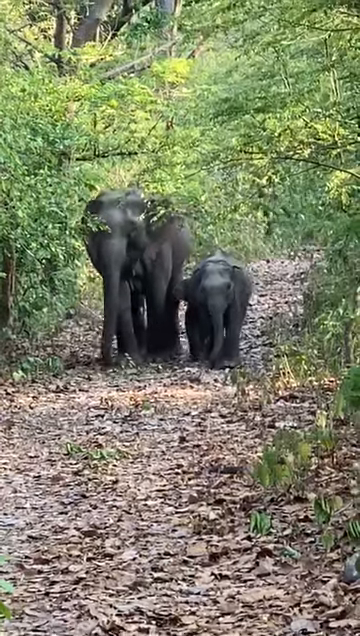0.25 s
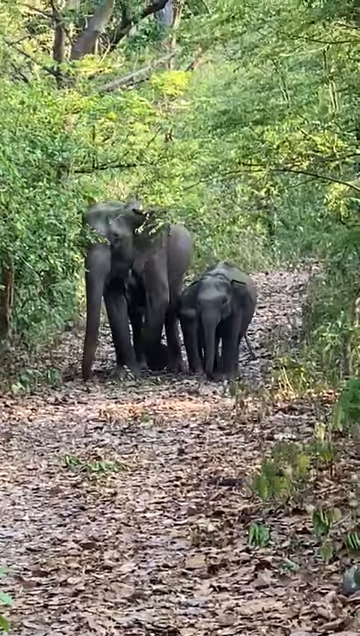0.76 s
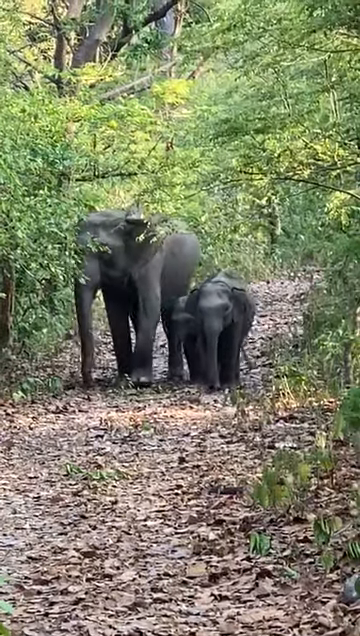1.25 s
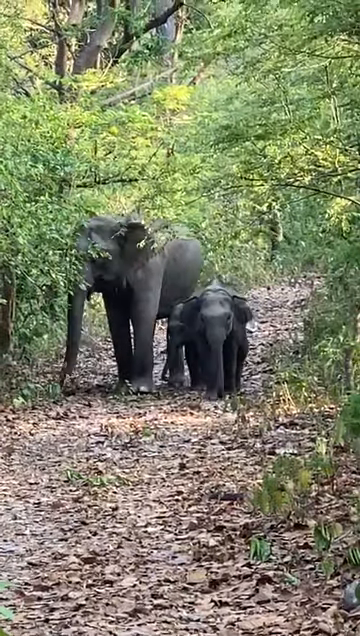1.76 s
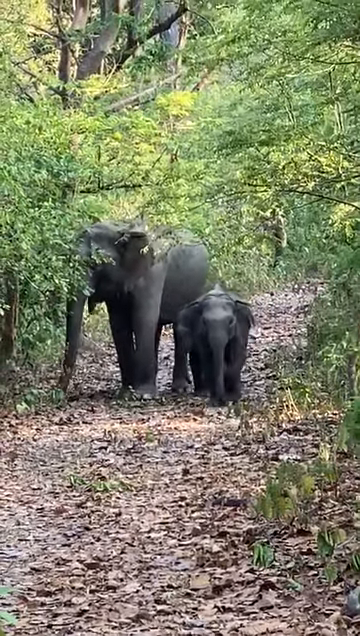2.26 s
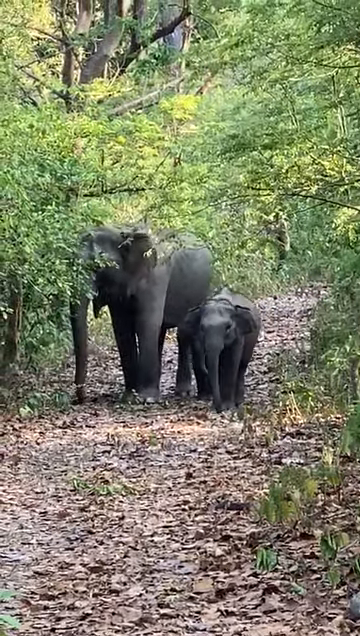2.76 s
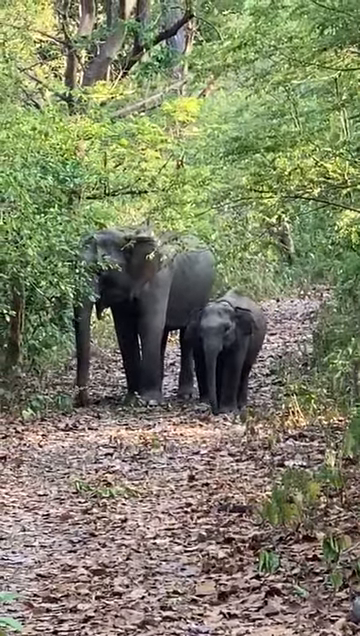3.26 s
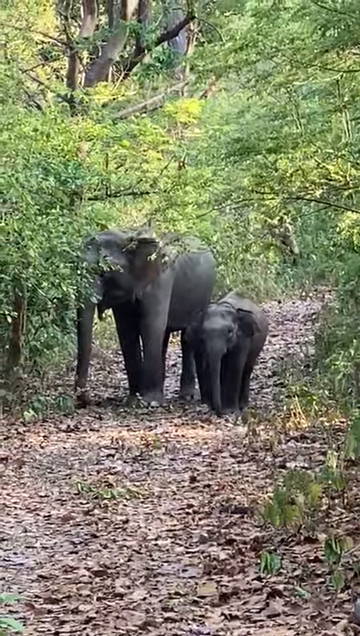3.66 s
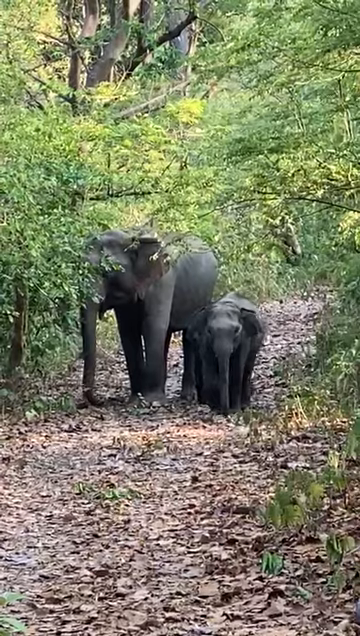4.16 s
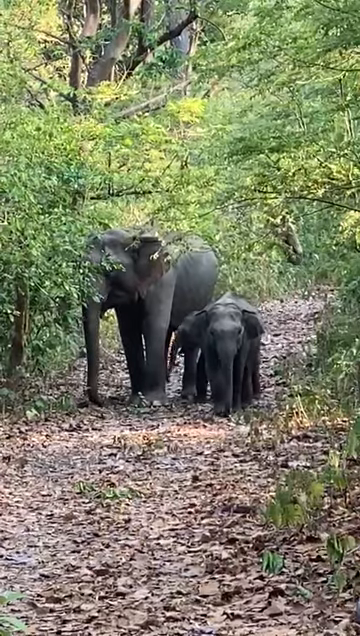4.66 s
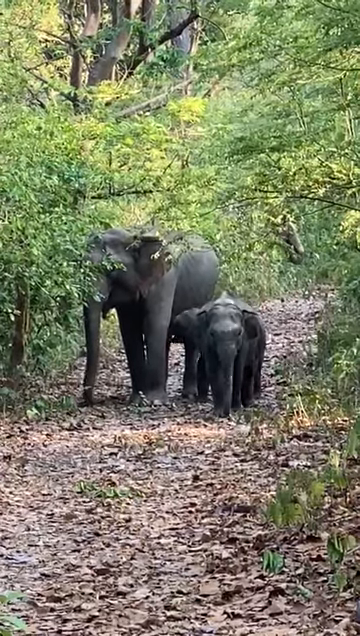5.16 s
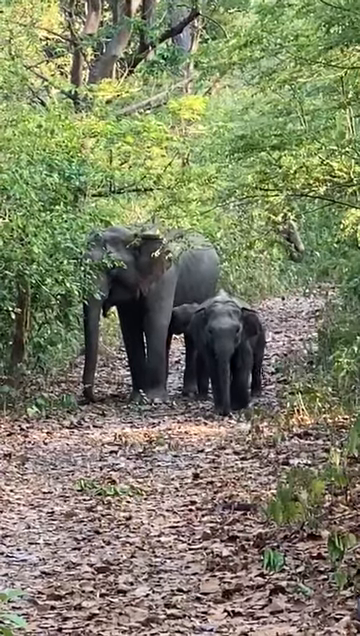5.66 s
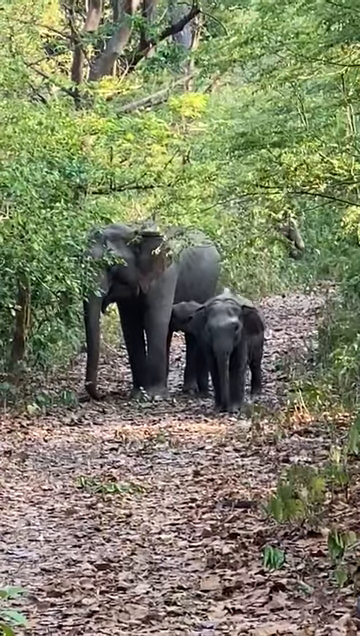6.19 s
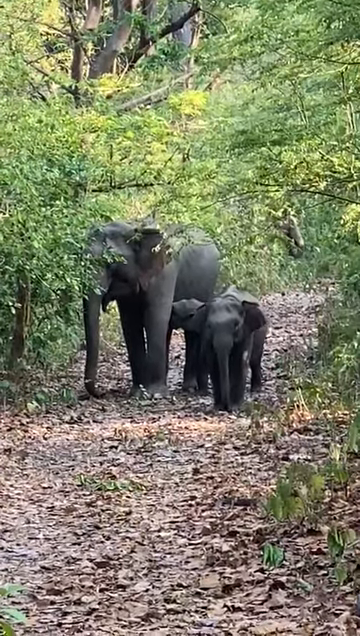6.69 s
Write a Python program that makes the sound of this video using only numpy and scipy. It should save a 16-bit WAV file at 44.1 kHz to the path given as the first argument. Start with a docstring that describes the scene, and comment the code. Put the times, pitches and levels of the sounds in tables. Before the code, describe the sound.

Two quick clear chirps open over a shimmering cricket chorus. A cuckoo's wavering scale emerges softly and rises; around three seconds a bird chatters brightly, and near five seconds comes a burst of clear whistles. After that the calls thin out and crickets dominate. Low damped thumps with leaf crunch, swelling rustle and a barely audible far barbet sit beneath. Open woodland, gentle echo, stereo microphone at a distance from the animals.

```python
"""Songbirds near and far whistle, slide and trill on a forest track by day: near-sines on drawn pitch and level curves.
A cuckoo climbs a wavering scale, a barbet hoots far off, and crickets chirp in stroke pairs over a far chorus.
Damped thumps knock on the path; noise bands make the hum, the leaf rustle and a thin flickering treble.
A decaying noise tail stands for the scatter off trunks and leaves; two spaced ports differ in phase by pitch."""
import sys
import numpy as np
from scipy import signal
from scipy.fft import rfft, irfft, next_fast_len
from scipy.io import wavfile

SR = 44100
rng = np.random.default_rng(int(sys.argv[2]) if len(sys.argv) > 2 else 0)


def int16_out(signal):
    """Quantize to a 16-bit WAV file."""
    q = np.round(np.clip(np.atleast_2d(signal).T, -1, 1) * 32767)
    wavfile.write(sys.argv[1], SR, q.astype(np.int16))


N = 305613
TIME = np.arange(N) / SR
SHARE = np.linspace(0, 1, 17)   # points along a note, as shares of its length


def from_db(db):
    """Decibels to amplitude."""
    return 10 ** (np.asarray(db) / 20)


def rms_one(x):
    """Scale to RMS 1."""
    return x / np.sqrt(np.mean(x ** 2) + 1e-20)


def at_time(rows):
    """Read a (s, value) curve at every sample."""
    return np.interp(TIME, *np.transpose(rows))


def at_hz(points, hz):
    """Read a (Hz, value) curve on a log frequency axis."""
    curve_hz, values = np.array(points).T
    return np.interp(np.log(hz), np.log(curve_hz), values)


def drift(rate_hz):
    """Slow random curve of RMS 1: noise through a two-pole lowpass, run at SR / 40."""
    step = 40
    pole = np.exp(-2 * np.pi * rate_hz * step / SR)
    white = rng.standard_normal(N // step + 2002)
    slow = signal.lfilter([1], [1, -2 * pole, pole * pole], white)[2000:]   # drop the settling
    return np.interp(np.arange(N) / step, np.arange(len(slow)), rms_one(slow))


def bandpass(x, low_hz, high_hz, order=2):
    """Butterworth band filter."""
    return signal.sosfilt(signal.butter(order, [low_hz, high_hz], "band", fs=SR, output="sos"), x)


# Left-right likeness of diffuse sound: pitch_hz, likeness_0_to_1
LIKENESS = [(30, 0.97), (60, 1), (125, 0.962), (250, 0.86), (500, 0.11), (1200, 0.938), (2500, 0.85),
            (5000, 0.97), (9000, .6)]


def band_pairs(size, per_octave, octaves):
    """Stereo noise bands, the two sides as alike as diffuse sound is at that pitch."""
    edges_hz = 22 * 2 ** np.arange(0, octaves, 1 / per_octave)
    white = rng.standard_normal((2, 2, size))   # neighbouring bands take alternate sources
    for k, (low_hz, high_hz) in enumerate(zip(edges_hz, edges_hz[1:])):
        centre_hz = np.sqrt(low_hz * high_hz)
        mid, side = bandpass(white[k % 2], low_hz, high_hz)
        alike = np.clip(at_hz(LIKENESS, centre_hz), 0, 1)
        yield centre_hz, np.sqrt(1 + alike) * mid + np.sqrt(1 - alike) * side * [[1], [-1]]


RISE_POWER = 3.0   # higher: notes start more abruptly


def arch(peak, crest, rise, fall):
    """Curve over a note: up by rise to its peak at share crest, then down by fall."""
    before = np.clip(1 - SHARE / crest, 0, 1)
    after = np.clip((SHARE - crest) / (1 - crest), 0, 1)
    return peak - rise * before ** RISE_POWER - fall * after ** 2


def swelling(start_s, length_s, pitch_hz, level_db, crest, rise_db, fall_db):
    """Rows (s, Hz, dB) of a note that swells to its crest and falls away."""
    levels_db = arch(level_db, crest, rise_db, fall_db)
    return np.transpose([start_s + length_s * SHARE, pitch_hz + 0 * SHARE, levels_db])


OVERTONE_DB = -35.5   # octave, re fundamental


def whistle(rows, bend_hz, edge_s):
    """A near-sine along its pitch and RMS level curves, with soft ends; returns its place and samples."""
    s, hz, level_db = np.transpose(rows)
    span = slice(max(round((s[0] - edge_s) * SR), 0), round((s[-1] + edge_s) * SR))
    t = TIME[span]
    fade = np.clip(np.minimum(t - s[0], s[-1] - t) / edge_s + 1, 0, 1) ** 2
    phase = 2 * np.pi * np.cumsum(np.interp(t, s, hz) + bend_hz[span]) / SR
    tone = np.sin(phase) + from_db(OVERTONE_DB) * np.sin(2 * phase)
    return span, np.sqrt(2) * fade * from_db(np.interp(t, s, level_db)) * tone


def strokes(times_s, peaks, pitches_hz, length_s, fall_hz):
    """Short Hann-shaped tones whose pitch slides by fall_hz (negative: upward)."""
    out, t = np.zeros(N + SR), np.arange(round(length_s * SR)) / SR
    for s, peak, hz in zip(times_s, peaks, pitches_hz):
        phase = 2 * np.pi * np.cumsum(hz + fall_hz * (.5 - t / length_s)) / SR
        start = round(s * SR)
        out[start:start + len(t)] += peak * np.hanning(len(t)) * np.sin(phase)
    return out[:N]


# Echo decay time to -60 dB: pitch_hz, t60_s
FOREST_T60 = [(500, 1), (1500, 0.91), (3000, 0.91), (6000, 0.97), (9000, 0.33)]


def forest(x):
    """Countless echoes off trunks: a noise tail that builds up briefly and dies band by band; energy 1."""
    t = np.arange(SR) / SR
    tail = 0
    for hz, pair in band_pairs(SR, per_octave=2, octaves=9.3):
        tail = tail + pair * from_db(-60 * t / at_hz(FOREST_T60, hz))
    tail = tail * (1 - np.exp(-t / 0.0045)) * (1 + 1.3 * np.exp(-t / 0.025))
    return signal.fftconvolve(x[None], rms_one(tail) / np.sqrt(SR), axes=1)[:, :N]


# Distant forest hum, relative spectrum: pitch_hz, density_db_per_hz
AIR = [(20, -31.5), (35, -17), (50, -6), (86, -6.5), (200, -13), (380, -16), (491, -11.5), (730, -30),
       (1610, -12), (2030, -17.5), (3810, -11), (4500, -7.5), (5270, 0), (5700, -4), (6060, -13.5),
       (7000, -44.5)]
# Leaf rustle, relative spectrum: pitch_hz, density_db_per_hz
LEAVES = [(150, -26), (300, -3), (600, -2.5), (1200, -1), (2000, -4), (3500, -7.5), (6000, -18)]
# Leaf rustle course, before lift and flutter: time_s, level_db
RUSTLE = [(0, -81), (.9, -88), (1.3, -74), (2.25, -75.5), (2.8, -88.5), (3.6, -75.5), (4, -87), (4.85, -86),
          (5.05, -79.5), (6.2, -84.5), (6.6, -78), (6.72, -71.5), (6.93, -79)]
AIR_DB, RUSTLE_LIFT_DB, RUSTLE_FLUTTER_DB, BACKGROUND_TOP_HZ = -60.5, 6.0, 1.9, 5620


def background():
    """Hum and swelling rustle share the noise bands; a steep lowpass leaves both dull above BACKGROUND_TOP_HZ."""
    air, leaves = 0, 0
    for hz, pair in band_pairs(N, per_octave=3, octaves=8.5):
        air = air + from_db(at_hz(AIR, hz)) * pair
        leaves = leaves + from_db(at_hz(LEAVES, hz)) * pair
    rustle_db = at_time(RUSTLE) + RUSTLE_LIFT_DB + RUSTLE_FLUTTER_DB * drift(5)
    rustle = from_db(rustle_db) * rms_one(leaves[:, ::-1])   # time-reversed, so unlike the hum
    lowpass = signal.butter(10, BACKGROUND_TOP_HZ, fs=SR, output="sos")
    return signal.sosfilt(lowpass, from_db(AIR_DB) * rms_one(air) + rustle)


# Thin treble course: time_s, level_db
SIZZLE = [(0, -65), (1, -68.5), (2.5, -68), (3.6, -65.5), (4.05, -68), (4.5, -69), (5.3, -67), (6.2, -66),
          (6.5, -77), (6.93, -70.5)]
# Thin treble, relative spectrum before flicker: pitch_hz, density_db_per_hz
SIZZLE_COLOUR = [(6000, -6.5), (7000, -1.5), (8000, -4.5), (9500, -1.5), (11000, -7.5), (12000, -16)]
SIZZLE_FLICKER_DB, SIZZLE_BAND_HZ = 19.0, 300


def sizzle():
    """Narrow noise bands that flicker, partly together and partly on their own."""
    out, white, together = 0, rng.standard_normal((3, N)), 0.43 * drift(9.6)
    for k, hz in enumerate(np.arange(6000, 12000, SIZZLE_BAND_HZ)):
        band = bandpass(white[k % 3], hz, hz + SIZZLE_BAND_HZ)
        flicker_db = SIZZLE_FLICKER_DB * np.minimum(together + drift(4), .8)
        out = out + from_db(at_hz(SIZZLE_COLOUR, hz) + flicker_db) * band
    return from_db(at_time(SIZZLE)) * rms_one(out)


# Knocks on the path: start_s, level_db, pitch_hz, crunch_db (re thump)
KNOCKS = [(1.45, -55, 493, -11), (1.895, -63, 334, -20), (2.674, -56, 517, -8), (3.54, -64, 700, 5),
          (3.695, -58.5, 801, 8.5), (3.906, -59, 245, -21), (4.843, -59, 544, -9), (5.689, -53, 468, -9)]
THUMP_T60_S, THUMP_ATTACK_S, CRUNCH_T60_S = 0.059, 0.00052, 0.076


def knocks():
    """A dull, quickly damped thump with a short crunch of dry leaves on top."""
    out, t = np.zeros(N), np.arange(SR // 8) / SR
    crunches = 2.4 * bandpass(rng.standard_normal((len(KNOCKS), len(t))), 300, 1800, order=1)
    for (s, level_db, hz, crunch_db), noise in zip(KNOCKS, crunches):
        thump = np.sin(2 * np.pi * hz * t) * from_db(-60 * t / THUMP_T60_S)
        thump = thump * (1 - np.exp(-t / THUMP_ATTACK_S))
        crunch = noise * from_db(crunch_db - 60 * t / CRUNCH_T60_S)
        start = round(s * SR)
        out[start:start + len(t)] += from_db(level_db) * (thump + crunch)
    return out


# Far cricket groups: pitch_hz, pitch_spread_hz, level_db
CHORUS = [(5335.3, 234, -62.5), (4482, 260, -65.5)]
SINGERS = 9   # per group
CHIRP_EVERY_S, TEMPO_SPREAD, CHIRP_JITTER_S = .148, .1, .006   # each singer keeps its own tempo
PAIR_S = 0.017   # between the two strokes of a chirp


def cricket_chorus():
    """Far singers of steady tempo; every chirp is a pair of wing strokes falling in pitch."""
    out = 0
    for hz, spread_hz, level_db in CHORUS:
        singer, draw = rng.random((3, SINGERS, 1)), rng.standard_normal((3, SINGERS, 60))
        every_s = CHIRP_EVERY_S * (1 + TEMPO_SPREAD * (2 * singer[0] - 1))
        first = singer[1] * every_s + np.cumsum(every_s + CHIRP_JITTER_S * draw[0], axis=1) - every_s
        heard = (first > 0) & (first < N / SR)
        offsets = np.linspace(-1.5, 1.5, SINGERS)[:, None] + .4 * draw[1]
        pitch = (hz + spread_hz * offsets)[heard]
        size, first = from_db(6.0 * singer[2] + 3.0 * draw[2])[heard], first[heard]
        pairs = strokes(np.r_[first, first + PAIR_S], np.r_[size, size], np.r_[pitch, pitch],
                        length_s=0.00876, fall_hz=800)
        out = out + from_db(level_db) * rms_one(pairs)
    return out


# Near cricket chirps, timed by first stroke: start_s, level_db (before stroke offsets), pitch_hz
CHIRPS = [(0.0413, -44, 5230), (0.1456, -47.5, 5550), (0.194, -42, 5300), (0.2688, -49.5, 5240),
          (0.3641, -45.5, 5140), (0.4339, -46, 5260), (0.7392, -51, 4960), (1.1154, -43.5, 5083),
          (1.2476, -45, 5057), (1.292, -46, 5530), (1.3972, -42.5, 5073), (1.5264, -41, 5020),
          (1.7045, -41.5, 5028), (1.8627, -43, 4980), (2.0328, -49, 5520), (2.4199, -56, 5150),
          (2.5551, -49, 5330), (2.6923, -42.5, 5150), (2.832, -43, 5130), (3.4451, -43.5, 5070),
          (4.1739, -47.5, 4990), (4.2517, -46, 5150), (4.3929, -42.5, 5050), (4.5366, -42.5, 5110),
          (4.6598, -48.5, 5560), (4.7027, -45, 5032), (4.8055, -45, 5750), (4.8549, -47, 5140),
          (5.007, -40.5, 4910), (5.1716, -45.5, 5610), (5.3343, -48, 5254), (5.5378, -45, 5450),
          (5.6905, -47, 5135), (5.7713, -41.5, 4950), (5.8272, -51, 5400), (5.911, -43, 5050),
          (5.9723, -48.5, 5250), (6.0591, -43.5, 5004), (6.113, -47.5, 5400), (6.1933, -45.5, 5050),
          (6.2607, -51, 5530), (6.3664, -46.5, 5090), (6.8109, -47, 5300)]
FIRST_DB, SECOND_DB = -2.5, -2.5   # stroke offsets


def near_crickets():
    """Each chirp is a pair of wing strokes, short tones falling in pitch."""
    s, level_db, hz = np.transpose(CHIRPS)
    peaks = from_db(np.r_[level_db + FIRST_DB, level_db + SECOND_DB])
    return strokes(np.r_[s, s + PAIR_S], peaks, np.r_[hz, hz], length_s=0.0086, fall_hz=610)


HOOT_FIRST_S, HOOT_EVERY_S, HOOT_HZ, HOOT_DB, HOOT_SPREAD_DB = .125, .3345, 489.5, -76.5, 3.3


def barbet():
    """One low note repeated evenly and softly, some hoots louder than others."""
    times_s = np.arange(HOOT_FIRST_S, N / SR, HOOT_EVERY_S)
    peaks = from_db(HOOT_DB + HOOT_SPREAD_DB * rng.standard_normal(len(times_s)))
    return strokes(times_s, peaks, np.full(len(times_s), HOOT_HZ), length_s=0.069, fall_hz=-21.5)


# Cuckoo scale, levels before the mix: start_s, length_s, pitch_hz, level_db
CUCKOO = [(0.068, 0.057, 1410, -65.5), (0.264, 0.067, 1430, -69), (0.341, 0.212, 1435, -71),
          (0.588, 0.12, 1470, -65.5), (.83, .24, 1481, -65), (1.16, 0.129, 1514, -61.5),
          (1.402, .25, 1525, -60), (1.78, 0.11, 1548, -55), (2.01, 0.262, 1598, -54.5),
          (2.39, .13, 1602, -55), (2.629, .27, 1650, -54.5), (3.01, 0.17, 1651, -55),
          (3.262, 0.26, 1722, -54), (3.644, 0.15, 1740, -54), (3.895, .265, 1778, -53.5),
          (4.28, 0.16, 1782, -54), (4.551, 0.26, 1820, -54), (4.949, 0.14, 1847, -55.5)]
SAG_HZ_PER_S, CUCKOO_FADE_DB_PER_S = 201.6, 6.5
CUCKOO_ATTACK_S, CUCKOO_RELEASE_S, CUCKOO_SOFT_DB = 0.024, 0.015, 10.5
WAVER_PER_S, WAVER_FROM_HZ, WAVER_SHARE = 31, 1140, 0.11   # depth: this share of the pitch above that


def cuckoo_scale():
    """Mellow sagging whistles with a slightly uneven vibrato that widens up the scale."""
    out = np.zeros(N)
    waver = np.sin(2 * np.pi * np.cumsum(WAVER_PER_S * (1 + .08 * drift(3.95))) / SR)
    for s, length_s, hz, db in CUCKOO:
        t = np.array([0, CUCKOO_ATTACK_S, length_s - CUCKOO_RELEASE_S, length_s])
        level_db = db - CUCKOO_FADE_DB_PER_S * t - CUCKOO_SOFT_DB * np.array([1, 0, 0, 1])
        rows = np.transpose([s + t, hz - SAG_HZ_PER_S * t, level_db])
        span, note = whistle(rows, WAVER_SHARE * (hz - WAVER_FROM_HZ) * waver, edge_s=.008)
        out[span] += note
    return out


# Closing cuckoo notes, levels before the mix: start_s, length_s, top_hz, level_db
CLOSING = [(5.2, 0.14, 1780, -54), (5.491, 0.12, 1686, -52.5), (5.821, 0.0608, 1529, -58)]
SCOOP_HZ, DROOP_HZ, ARCH_CREST, ARCH_RISE_DB, ARCH_FALL_DB = 280, 131, 0.454, 11, 6


def cuckoo_closing():
    """Plain whistles whose pitch and level both arch."""
    out = np.zeros(N)
    for s, length_s, top_hz, db in CLOSING:
        hz = arch(top_hz, ARCH_CREST, SCOOP_HZ, DROOP_HZ)
        rows = swelling(s, length_s, hz, db, ARCH_CREST, ARCH_RISE_DB, ARCH_FALL_DB)
        span, note = whistle(rows, np.zeros(N), edge_s=.008)
        out[span] += note
    return out


# Buzzy trills, levels before pulsing and mix:
# start_s, length_s, centre_hz, level_db, swings_per_s, depth_hz, pulsing_0_to_1
TRILLS = [(-.06, .14, 3250, -44.5, 60.8, 149, 0.7), (.2, 1.7, 3212, -64, 14, 30, .8),
          (1.04, .3, 3930, -53.5, 12, 30, 0.5), (4.213, 0.23, 6980, -44.5, 140, 260, .4),
          (4.458, .05, 4050, -44.5, 50, 60, .9), (4.494, 0.15, 3445, -41, 95, 130, 0.25)]
TRILL_CREST, TRILL_RISE_DB, TRILL_FALL_DB = 0.53, 15, 10.5
TRILL_SCOOP = 2.2   # starts this many depths low


def trills():
    """Pitch and level swing unevenly, the quickest fast enough to buzz."""
    out = np.zeros(N)
    for s, length_s, hz, db, rate, depth_hz, pulsing in TRILLS:
        swing = 2 * np.pi * np.cumsum(rate * (1 + .12 * drift(40))) / SR
        pitch_hz = hz - depth_hz * TRILL_SCOOP * (1 - SHARE) ** 4
        rows = swelling(s, length_s, pitch_hz, db, TRILL_CREST, TRILL_RISE_DB, TRILL_FALL_DB)
        span, note = whistle(rows, depth_hz * np.sin(swing) + 60 * drift(50.33), edge_s=.006)
        out[span] += note * (1 + pulsing * np.cos(swing[span]))
    return out


# Songbird tables: levels before distance loss; crest_share is where the note is loudest.
# Short slides: start_s, length_s, from_hz, to_hz, level_db, crest_share
SLIDES = [(1.59, 0.031, 4200, 3500, -49.5, .6), (1.762, .065, 2300, 3360, -52, 0.83),
          (1.827, 0.022, 3410, 3850, -54, .6), (1.844, .05, 3750, 3115, -47.5, 0.5),
          (1.992, 0.062, 2520, 3310, -50, 0.65), (2.062, 0.058, 2750, 3377, -47.5, 0.8),
          (2.2, 0.019, 2410, 3187, -50, 0.6), (2.22, 0.042, 2595, 3445, -48, 0.4),
          (3.225, 0.02, 3073, 3900, -38.5, 0.9), (3.445, 0.034, 2920, 2446, -41, 0.06),
          (4.708, 0.027, 2820, 2436, -45.5, 0.56), (4.76, 0.0517, 2670, 3366, -38.5, 0.9),
          (4.859, 0.049, 3290, 3533, -38.5, 0.7), (4.958, 0.057, 3520, 3637, -32, 0.58),
          (5.069, 0.0375, 3410, 3675, -36, 0.66), (5.207, 0.13, 3200, 2214, -61, 0.24),
          (5.569, .12, 3154, 3382, -60, 0.2), (5.913, 0.034, 2310, 2130, -64, 0.3),
          (5.944, 0.055, 2154, 2460, -59, .5), (6.102, .07, 2605, 2890, -66, .4)]
SLIDE_EASE, SLIDE_RISE_DB, SLIDE_FALL_DB = 2.3, 13, 10.5


def slides():
    """Pitch eases into its last value; yields rows and pitch tremble factor."""
    for s, length_s, from_hz, to_hz, db, crest in SLIDES:
        hz = to_hz + (from_hz - to_hz) * (1 - SHARE) ** SLIDE_EASE
        yield swelling(s, length_s, hz, db, crest, SLIDE_RISE_DB, SLIDE_FALL_DB), 1


# Long rising glides: start_s, length_s, from_hz, to_hz, level_db
GLIDES = [(1.277, .09, 2930, 4050, -49), (3.593, .1, 3050, 4400, -54.5), (3.88, 0.13, 2660, 4520, -53),
          (4.187, .19, 2500, 4715, -53), (4.564, .11, 3940, 4860, -52), (4.873, .12, 3930, 4960, -52.5),
          (5.131, .1, 3930, 4770, -55.5), (5.472, .08, 2715, 3260, -58)]
GLIDE_EASE, GLIDE_CREST, GLIDE_RISE_DB, GLIDE_FALL_DB, GLIDE_TREMBLE = 1.4, 0.66, 13.5, 0, 3.96


def glides():
    """Pitch climbs, easing slightly, with a strong tremble."""
    for s, length_s, from_hz, to_hz, db in GLIDES:
        hz = to_hz + (from_hz - to_hz) * (1 - SHARE) ** GLIDE_EASE
        yield swelling(s, length_s, hz, db, GLIDE_CREST, GLIDE_RISE_DB, GLIDE_FALL_DB), GLIDE_TREMBLE


# Chatter: start_s, length_s, from_hz, turn_hz, end_hz, level_db, crest_share
CHATTER = [(.305, 0.016, 1678, 2780, 1600, -54, 0.7), (2.848, 0.0184, 7150, 7170, 6800, -46.5, 0.7),
           (2.895, 0.023, 7130, 7000, 6300, -41.5, .55), (2.932, 0.033, 6830, 6950, 5470, -42, 0.83),
           (2.975, 0.043, 5565, 6440, 4810, -38.5, 0.99), (3.042, .043, 4280, 5820, 3810, -35.5, 0.4),
           (3.119, 0.06, 3308, 5370, 2300, -39, 0.32), (3.26, .031, 4750, 4560, 2690, -40, .6)]
BREAK_S, CHATTER_RISE_DB, CHATTER_FALL_DB, CHATTER_TREMBLE, CHATTER_EASE = .009, 14, 18.5, 3.1, 1.3


def chatter():
    """Pitch bends to a turning point, mostly upward, then breaks off downward."""
    for s, length_s, from_hz, turn_hz, end_hz, db, crest in CHATTER:
        turn = 1 - BREAK_S / length_s
        hz = np.interp(SHARE, [0, turn, 1], [turn_hz, turn_hz, end_hz])
        hz = hz + (from_hz - turn_hz) * np.clip(1 - SHARE / turn, 0, 1) ** CHATTER_EASE
        yield swelling(s, length_s, hz, db, crest, CHATTER_RISE_DB, CHATTER_FALL_DB), CHATTER_TREMBLE


# Falling notes: start_s, length_s, from_hz, hold_hz, end_hz, level_db, crest_share
FALLS = [(.098, 0.048, 3484, 3696, 2836, -35.5, 0.35), (.178, 0.051, 3557, 3750, 2800, -39, 0.75),
         (0.932, 0.11, 4400, 4400, 3784, -52, 0.8), (1.615, 0.043, 3500, 3460, 1900, -50.5, .3),
         (3.408, 0.039, 2470, 2996, 2938, -37.5, 0.6), (3.477, 0.036, 2460, 2470, 1750, -48, .3),
         (6.86, .07, 1290, 1250, 1016, -72, 0.7)]
FLICK_SHARE, HOLD_SHARE, FALL_RISE_DB, FALL_FALL_DB = .2, .35, 10.5, 9.5


def falls():
    """Pitch flicks to a hold, mostly upward, then falls for the rest of the note."""
    for s, length_s, from_hz, hold_hz, end_hz, db, crest in FALLS:
        hz = np.interp(SHARE, [0, FLICK_SHARE, HOLD_SHARE, 1], [from_hz, hold_hz, hold_hz, end_hz])
        yield swelling(s, length_s, hz, db, crest, FALL_RISE_DB, FALL_FALL_DB), 1


# Level-pitch notes; the first 2240 Hz row is the ringing tail of an earlier call:
# start_s, length_s, pitch_hz, level_db
LEVEL_NOTES = [(0.014, 0.021, 3320, -40), (-.05, 0.213, 2240, -69), (.42, 0.0627, 3234, -58),
               (.46, 0.14, 8100, -69), (0.467, .06, 8955, -61), (.5, 0.074, 3180, -61),
               (0.661, .08, 3300, -65), (0.771, 0.073, 7790, -67), (.77, 0.073, 3247, -65.5),
               (0.881, 0.087, 3230, -63), (0.908, 0.068, 7600, -63.5), (1.02, 0.0518, 3240, -59),
               (1.05, 0.077, 7490, -63), (1.057, 0.062, 8470, -65.5), (1.131, 0.097, 3180, -64.5),
               (1.347, .08, 4006, -57), (1.39, .08, 3214, -60), (1.52, 0.0426, 3179, -55.5),
               (1.875, 0.082, 3144, -49.5), (2.68, 0.022, 3310, -66), (3.245, 0.018, 3978, -37),
               (3.371, 0.018, 2100, -51.5), (5.66, 0.118, 1650, -70.5), (5.717, 0.045, 7610, -61.5),
               (5.78, .08, 3370, -71), (5.837, 0.104, 9080, -60.5), (5.98, 0.07, 8110, -61),
               (6.1, .06, 7850, -61), (6.108, 0.057, 8700, -60), (6.031, 0.073, 2430, -71),
               (6.47, 0.11, 1379, -69)]
LEVEL_CREST, LEVEL_RISE_DB, LEVEL_FALL_DB = 0.32, 15.5, 5.5


def level_notes():
    """One pitch per note, swelling early."""
    for s, length_s, hz, db in LEVEL_NOTES:
        yield swelling(s, length_s, hz, db, LEVEL_CREST, LEVEL_RISE_DB, LEVEL_FALL_DB), 1


def songbirds(wet_db, far_wet_db, far_loss_db, flutter_db):
    """Direct notes and their send to the trees; fainter notes are farther off and flutter in moving air."""
    direct, send = np.zeros(N), np.zeros(N)
    wobble_hz, gusts = 14 * drift(68), np.clip(drift(41), -2.5, 1)
    for rows, tremble in [*slides(), *glides(), *chatter(), *falls(), *level_notes()]:
        distance = min(-(rows[:, 2].max() + 40) / 15, 1)   # 0 at -40 dB, 1 from -55 dB down
        far = max(distance, 0)
        span, note = whistle(rows, wobble_hz * tremble, edge_s=.003)
        note = note * from_db(far * (flutter_db * gusts[span] - far_loss_db))
        direct[span] += note
        send[span] += note * from_db(wet_db + far_wet_db * distance)
    return direct, send


def scene():
    """Mix direct sound, forest echoes and background."""
    songs, song_send = songbirds(wet_db=-9.5, far_wet_db=5.0, far_loss_db=2.0, flutter_db=3.5)
    buzz, scale, chirps = trills(), cuckoo_scale() + cuckoo_closing(), near_crickets() + cricket_chorus()
    blows, hoots, thin = knocks(), barbet(), sizzle()
    direct = songs + from_db(-4.5) * buzz + from_db(-1) * scale + chirps + blows + hoots + thin
    send = (song_send + from_db(-6) * buzz + from_db(-8) * scale + from_db(-8.5) * chirps
            + from_db(-9) * blows + from_db(-4) * hoots + from_db(-15) * thin)
    return direct + forest(send) + background()


# Phase between the ports: pitch_hz, left_lead_rad
PORT_PHASE = [(0, 0), (400, 0), (1000, 1.0), (1300, .1), (2050, 0), (2500, .8), (3300, .2), (4100, .3),
              (4720, 1.6), (4960, 5.2), (5250, 6.2), (6600, 6.6), (8100, 8.0), (9100, 8.7), (11700, 9.3)]
CUTOFF_HZ = 12150


def record(dry):
    """The two ports differ in phase by pitch, half the lead on each; the top is cut."""
    size = next_fast_len(N + SR // 4)
    lead_rad = np.interp(np.fft.rfftfreq(size, 1 / SR), *np.transpose(PORT_PHASE))
    turn = np.exp(.5j * lead_rad * np.array([[1], [-1]]))
    ports = irfft(rfft(dry, size, axis=1) * turn, size, axis=1)[:, :N]
    return signal.sosfilt(signal.cheby2(12, 70, CUTOFF_HZ, fs=SR, output="sos"), ports)


dry = scene()
out = record(dry)
int16_out(out)
```